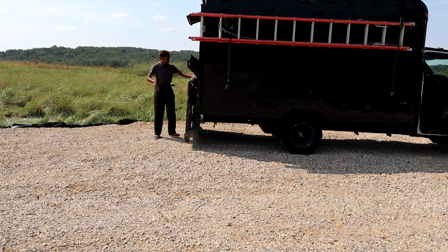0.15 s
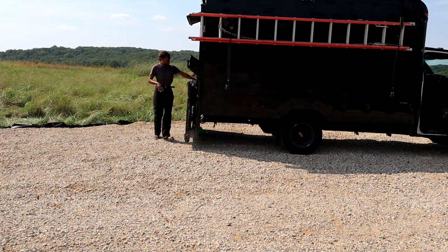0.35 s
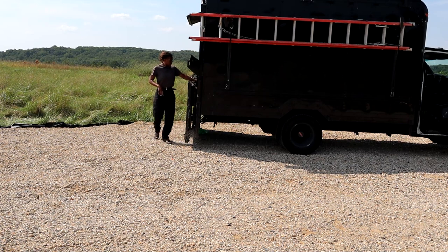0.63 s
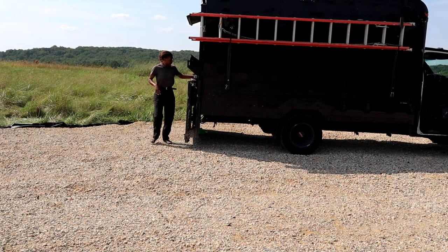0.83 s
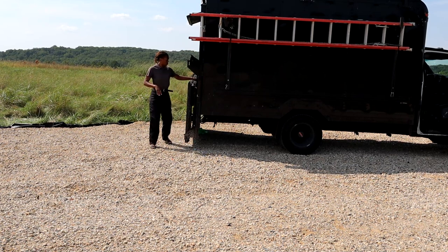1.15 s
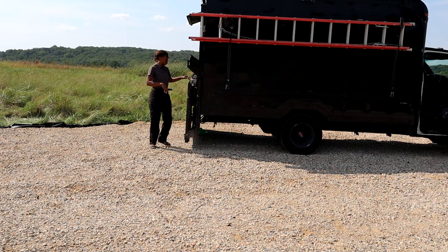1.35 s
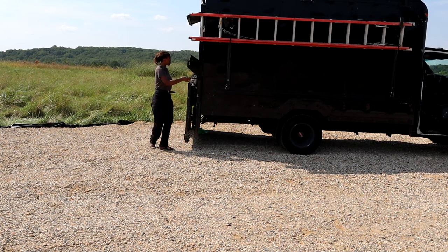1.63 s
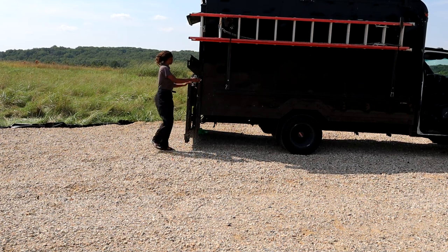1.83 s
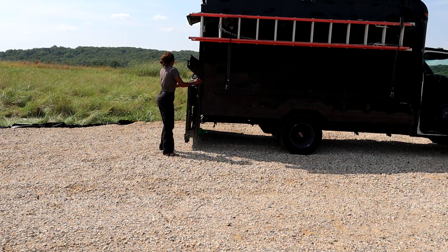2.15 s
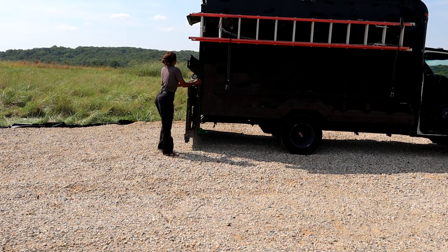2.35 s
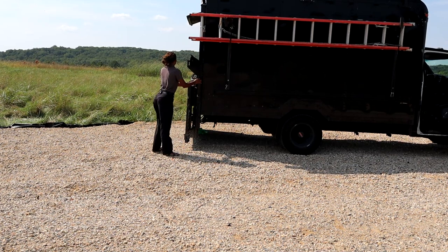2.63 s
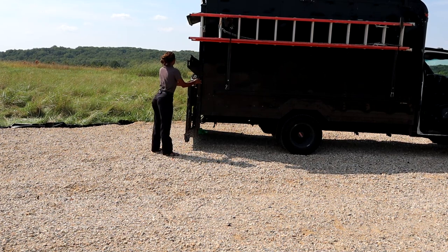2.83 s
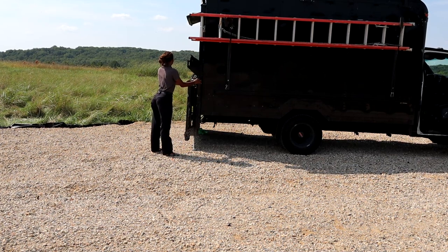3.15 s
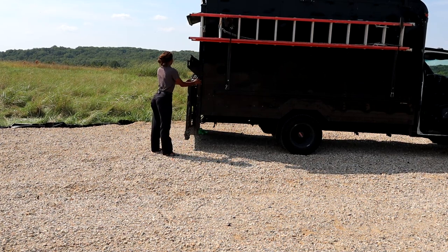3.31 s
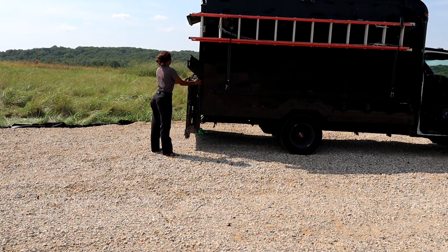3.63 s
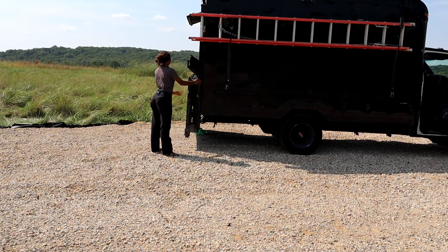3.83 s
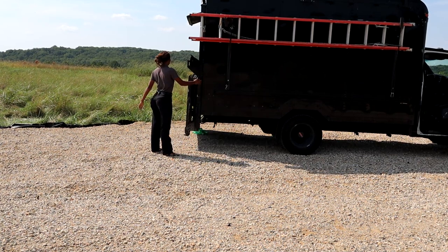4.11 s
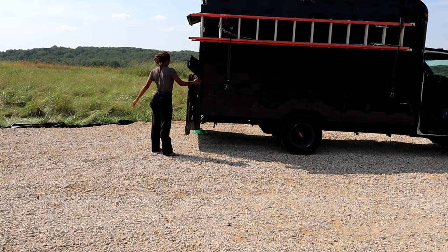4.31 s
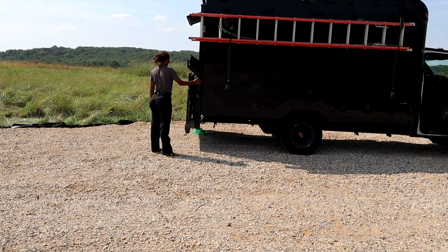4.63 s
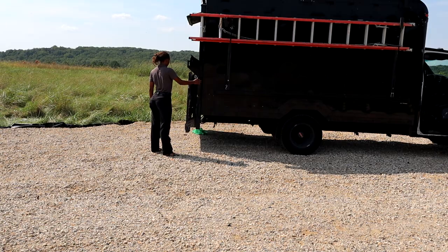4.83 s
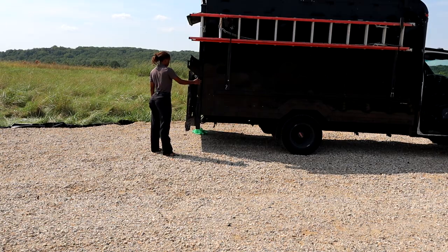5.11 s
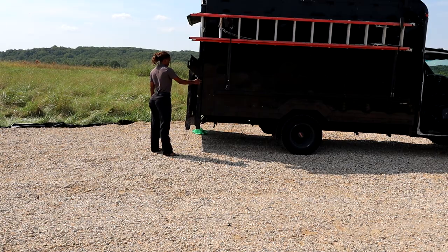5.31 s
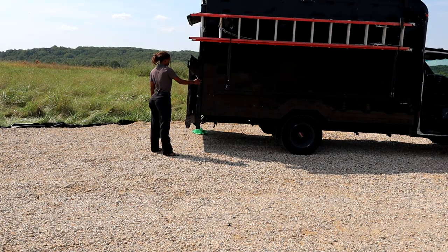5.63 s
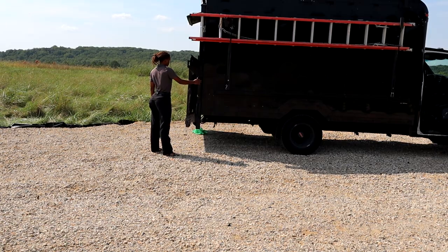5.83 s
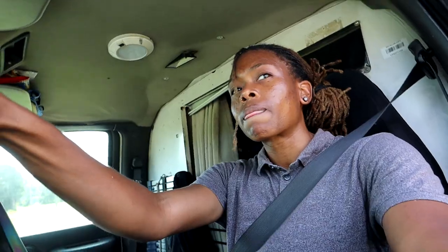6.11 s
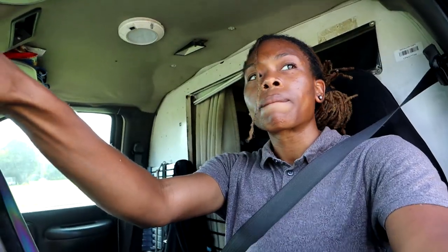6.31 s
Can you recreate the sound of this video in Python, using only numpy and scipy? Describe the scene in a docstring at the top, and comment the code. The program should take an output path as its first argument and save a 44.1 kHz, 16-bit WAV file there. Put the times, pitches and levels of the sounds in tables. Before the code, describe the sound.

From 0 s, an open gravel yard: strong low wind gusts buffet the microphone, over faint high hiss, throbbing insects and a soft low drone. From about 0.5 s soles crunch and individual stones knock, busiest between 1 and 1.8 s. At 1.4 s a steel latch snaps with a short, dry triple clatter; a bright scuff and grit snap follow at 1.6 s. Steps thin out until 2.75 s. At 2.8 s a relay clacks twice and an electric pump motor spins up within half a second, straining at first, into a dense, nasal, buzzing whine with rushing oil noise. It holds, rising very slightly in pitch and growing a little louder, while gusts weaken and the drone swells. At 6.0 s an abrupt cut to a moving truck's cab: loud overloaded engine boom, trim rattle and several hard, thudding knocks, ending around 6.45 s.

```python
"""A gravel yard on a windy day: gusts buffet the microphone, feet crunch, insects sing, a low drone hums.
At 1.4 s a latch snaps on its steel frame. At 2.8 s a relay clacks and the liftgate's pump motor spins up.
Its whine is a stack of sine waves; the wind, hiss and crunch are shaped noise and clicks.
At 6.0 s the scene cuts to the moving truck's cab: boom from ringing low tones, and a few hard knocks."""
import sys
import numpy as np
from scipy import signal
from scipy.fft import rfft, irfft, next_fast_len
from scipy.io import wavfile
from scipy.ndimage import uniform_filter1d

SR = 44100
rng = np.random.default_rng(int(sys.argv[2]) if len(sys.argv) > 2 else 0)


def pcm_store(signal):
    """Save signal as 16-bit PCM."""
    levels = np.round(np.clip(np.atleast_2d(signal), -1, 1) * 32767)
    wavfile.write(sys.argv[1], SR, levels.astype(np.int16).T)


N = 284533

CUT_S = 6.015   # the yard gives way to the cab
TOP_EDGE_HZ = 15690   # hardly anything is left above this

# Pump motor: (time [s], whine gain [dB], oil noise level [dB], strain [0-1])
PUMP = [(2.8, -38, -46, 0.6), (2.9, -35.5, -37.5, 0.85), (3.01, -32.5, -34.5, 0.8),
        (3.14, -32.5, -36.5, 0.56), (3.62, -33, -35, 0.62), (3.99, -30, -34.5, 0.64),
        (5.0, -29.5, -35, 0.44), (6.0, -27.5, -35.5, 0.65)]
# Pump speed: (time [s], pump pulses [per s])
PUMP_SPEED = [(2.81, 63.9), (2.85, 71.2), (2.9, 77.9), (2.94, 85.1), (2.97, 89.0), (3.0, 92.3),
              (3.04, 94.6), (3.15, 98.5), (3.25, 99.9), (3.36, 100.6), (3.98, 102.2), (5.04, 103.6),
              (5.22, 103.5), (5.99, 104.4)]
# Lower tones of the whine: (multiple of the pulse rate, level before boosts [dB])
LOW_MULTIPLES = [(1, -20), (2, -10.5), (3, -15), (4, -7), (5, -13), (6, -7), (7, -11.5), (8, -10), (9, -8),
                 (10, -8), (11, -10.5), (12, -11), (13, -8.5), (14, -11.5), (15, -6), (16, -15), (17, -21),
                 (18, -13.5), (19, -17), (20, -13), (21, -24), (22, -13), (23, -20), (24, -15), (25, -21.5),
                 (26, -43.5), (27, -54), (28, -29.5), (29, -26.5), (30, -43.5), (31, -31.5), (32, -53),
                 (33, -39), (34, -38.5), (35, -33), (36, -32.5)]
# Higher tones of the whine: (multiple, level once up to speed, before boosts [dB])
HIGH_MULTIPLES = [(43, -37), (44, -32.5), (45, -43), (46, -33), (48, -37.5), (49, -37), (62, -42),
                  (63, -36), (64, -32), (65, -38), (66, -32), (67, -58), (68, -38), (69, -38)]
# Faint commutator and gear-mesh whistles: (multiple, level before boosts [dB], extra early in the lift [dB])
WHISTLES = [(76, -44, 0), (88, -42, 9), (107, -43, 5), (112, -39, 0), (128, -45, 0), (152, -43, 6)]
# The whine's balance shifts as the gate rises: (multiple, level early in the lift against its end [dB])
BALANCE_SHIFT = [(4, 0), (6, -1.5), (8, 2), (9, 1), (10, -1), (11, -0.5), (12, 0.5), (13, 4), (14, -1),
                 (15, -3), (16, 2), (17, 2), (18, 0.5), (20, -1), (22, -0.5), (23, -1.5), (25, 1)]
# Resonances of the pump housing: (pitch [Hz], half width [Hz], boost at full strain [dB])
HOUSING = [(552, 22, 19.5), (805.6, 9.5, 14), (1005, 12, 9), (1210, 16, 7.5), (1340, 44, 3),
           (1760, 6.4, 16), (1698, 92, -1.5), (2547, 16, 6.5), (3128, 41, 25.5)]
# Colour of the oil noise: (pitch [Hz], relative level [dB per Hz])
OIL_COLOUR = [(180, -57), (300, -7), (460, -5.5), (600, 0), (760, -10), (850, 3.5), (1200, -8), (1360, 4.5),
              (1960, -16.5), (2330, -13.5), (3500, -17), (4000, -32.5), (4900, -23), (5900, -33.5),
              (6800, -27.5), (9000, -31.5), (12000, -70)]
FRAME_HZ, FRAME_HALF_WIDTH_HZ, FRAME_DB = 1364, 37, 7.5   # the frame lifts any multiple that lies near here
SPIN_UP_END_S, SPIN_UP_WAVER_DB, SPIN_UP_HIGH_DB = 3.229, 2.0, -10   # ragged tones, weak high multiples
EARLY_END_S = 3.9   # the extra level of the whistles has faded by now

# Engine and trim in the cab: (time [s], boom level before overload [dB], rattle level before shaking [dB])
CAB = [(6.015, -25, -55), (6.057, -10.5, -50), (6.171, -13.5, -55), (6.195, -25.5, -56.5),
       (6.293, -12, -53), (6.309, -36, -64), (6.327, -18, -55), (6.373, -23.5, -56), (6.452, -21, -48)]
# Boom tones of the cab: (pitch [Hz], relative level [dB], time to ring down by 60 dB [s])
CAB_MODES = [(42.4, -3.5, 0.18), (93, 4, 0.067), (141.6, 0, 0.056), (194, -4, 0.044)]
# Colour of the trim rattle: (pitch [Hz], relative level [dB per Hz])
RATTLE_COLOUR = [(290, -41), (500, -7), (769, -15.5), (804, -4.5), (1410, -20), (1490, -24.5),
                 (3090, -30.5), (7000, -46), (9100, -73), (15400, -120)]
# Hard knocks: (time [s], depth before rounding [dB], width [ms], tip rounding [ms])
KNOCKS = [(6.061, -6.5, 2.6, .03), (6.083, -9, 2.6, .05), (6.128, -7.5, 2.2, .02), (6.150, -8, 2.2, .03),
          (6.282, -7, 4.0, .4), (6.410, -10.5, 2.6, .05), (6.444, -10, 2.6, .05)]
FIRINGS_PER_S, FIRING_JITTER = 45.1, 0.12   # average rate; unevenness as a share of a cycle
REBOUND_S, REBOUND_WIDTH_S, REBOUND_SHARE = 0.006, 0.004, 0.7   # after a knock the pressure swings back

# Gusts on the microphone: (time [s], level [dB], length at half height [s], flutter against the gust [dB])
GUSTS = [(0.173, -15.5, .11, -12), (0.295, -19, 0.076, -11.5), (.479, -21, 0.047, -8.5),
         (0.737, -18.5, 0.25, -9), (1.01, -22.5, 0.11, -8.5), (1.166, -26, 0.083, -7),
         (1.28, -25, 0.052, -7), (1.43, -18.5, 0.075, -12.5), (1.537, -18.5, 0.027, -20),
         (1.65, -16, 0.066, -12), (1.75, -19.5, 0.1, -12), (1.847, -14, 0.098, -17.5),
         (2.075, -32.5, 0.06, -3), (2.204, -26.5, 0.032, -16), (2.314, -19.5, 0.12, -16),
         (2.454, -17.5, 0.077, -20), (2.642, -22, 0.1, -5), (2.95, -18, 0.038, -8),
         (3.069, -16.5, 0.12, -11), (3.314, -24, 0.074, -10), (3.543, -23.5, 0.1, -8.5),
         (3.67, -20, 0.09, -16), (4.27, -28, 0.089, -5.5), (4.775, -27, 0.042, -16),
         (4.947, -24.5, 0.13, -18), (5.073, -23.5, .07, -10), (5.56, -28.5, 0.066, -10)]
# Buffeting between gusts: (time [s], level before lumps [dB])
BREEZE = [(0.0, -26.5), (1.2, -31), (1.7, -20), (2.1, -29), (3.9, -32), (6.0, -31.5)]
# Colour of the deep buffeting: (pitch [Hz], relative level [dB per Hz])
BUFFET_COLOUR = [(11, -44), (18, 6), (50, 4), (70, -4.5), (124, -23.5), (155, -21), (179, -20.5),
                 (261, -39), (293, -36), (400, -41), (520, -79), (880, -120)]
# Colour of the thinner rush: (pitch [Hz], relative level [dB per Hz])
RUSH_COLOUR = [(65, -9), (110, -2), (189, -2.5), (292, -4), (350, -11.5), (566, -12.5), (649, -20),
               (903, -15.5), (1200, -26.5), (2230, -36.5), (4000, -50), (5200, -54), (8800, -120)]
BREEZE_LUMPS_DB, RUSH_DB = 4, -38.5
RUSH_FOLLOWS = 0.083   # the rush takes this share of the buffet's swing in dB
FLUTTER_HZ = 58, 115.7   # band of the faster eddies that ride on a gust

# Latch snapping on the frame: (time [s], strength [dB], tilt [dB per octave], chatter fade [s])
LATCH_BLOWS = [(1.403, -26, -31, 0.003), (1.4172, -21, 4.5, 0.007), (1.437, -30, -7, 0.024)]
# Ringing tones of the steel: (pitch [Hz], relative level [dB], time to ring down by 60 dB [s])
STEEL_MODES = [(845, -3, 0.022), (1015, -0.5, 0.042), (1390, -1, 0.016), (1620, -12, 0.014),
               (1800, 0.5, 0.019), (2140, -3, 0.013), (2460, -7, 0.021), (2680, -13, 0.024),
               (2980, -15, .012), (3410, -13, 0.0099), (4650, -37, .01)]
# Relay solenoid pulling in and bouncing: (time [s], strength [dB], tilt [dB per octave], chatter fade [s])
RELAY_BLOWS = [(2.7935, -22.5, -3.5, 0.01), (2.808, -23, -8, 0.02)]
# Ringing tones of the solenoid: (pitch [Hz], relative level [dB], time to ring down by 60 dB [s])
SOLENOID_MODES = [(1000, -20, 0.027), (1175, 4, 0.035), (1440, -4.5, 0.04), (1680, -16, 0.023),
                  (1930, -9, 0.035), (2200, -14, 0.023), (2390, -9, 0.032), (2700, -20, 0.023)]
CONTACT_S = 0.002976   # chatter builds for this long before the hard contact

# Soles pressing into gravel: (time [s], crunch level [dB], length at half height [s])
STEPS = [(.61, -46, 0.043), (.765, -40, 0.018), (.815, -48, .04), (.992, -40.5, 0.039), (1.12, -46, 0.14),
         (1.19, -42.5, 0.054), (1.32, -50.5, 0.099), (1.615, -36, 0.054), (1.68, -42, 0.087),
         (1.795, -46, 0.041), (1.965, -69, 0.034), (2.16, -50, 0.034), (2.27, -51, 0.083),
         (2.49, -57, 0.035)]
# Soles dragging, a bright swish: (time [s], level [dB], length at half height [s])
SCUFFS = [(1.0, -58, .1), (1.63, -48.5, 0.079), (1.78, -53, .09), (2.75, -54, .08)]
# Single stones knocking: (time [s], level of the main ring [dB], pitch of the main ring [Hz])
STONES = [(0.596, -39, 847), (0.622, -43, 1550), (0.715, -44, 1600), (0.759, -43, 740), (0.807, -38, 970),
          (0.992, -35, 1175), (1.073, -37, 1430), (1.186, -28.5, 760), (1.314, -36, 896),
          (1.34, -42.5, 1690), (1.591, -49, 710), (1.616, -31, 875), (1.66, -35, 980), (1.70, -37, 1000),
          (1.777, -35, 780), (2.217, -38, 1040), (2.268, -37, 1040), (2.295, -37, 747), (2.608, -37, 1049)]
# Bright grit snapping: (time [s], noise level before the treble filter [dB])
GRIT_TICKS = [(1.612, -34.5), (1.7814, -47), (2.2463, -51)]
SHUFFLE_DB = -57   # crunch between the steps

# Far hiss: (time [s], level [dB])
AIR = [(0.0, -57), (1.0, -55), (1.8, -53.5), (1.9, -58.5), (2.5, -56), (3.4, -55), (3.9, -53), (4.7, -51),
       (6.0, -50.5)]
# Colour of the far hiss: (pitch [Hz], relative level [dB per Hz])
HISS_COLOUR = [(1760, 4.5), (3000, -2), (3610, -11), (3980, -36), (4440, -6), (4660, -1.5), (5780, -16),
               (7300, -11), (8100, -2.5), (9100, -8), (10200, -2.5), (12400, -0.5), (15600, -7.5)]
# Insect bands: (pitch [Hz], width setting [Hz], level over the hiss before throbbing [dB], throbs [per s])
INSECTS = [(4530, 500, -13, 23), (8500, 930, -12.5, 22)]
# Low drone: (time [s], level before wavering [dB])
DRONE = [(0.0, -52), (1.4, -37), (2.0, -47), (3.8, -39.5), (4.6, -34.5), (6.0, -32)]
DRONE_HZ, DRONE_RING_S, DRONE_WAVER_DB = 152.2, 2.84 / 10.7, 0.5   # ring-down time is for 60 dB
DRONE_OVERTONE_HZ, DRONE_OVERTONE_DB = 294.2, -49


def pump():
    """Multiples of the pulse rate swell where they cross housing resonances, over pulsing oil noise."""
    per_s, = in_time(PUMP_SPEED)
    whine_db, oil_db, strain = in_time(PUMP)
    # the shaft runs unevenly, more so under strain
    unevenness = 0.012 * (1 + 3 * strain ** 3) * drift(8)
    turn = 2 * np.pi * np.cumsum(per_s) / SR + unevenness

    # tone levels are worked out on every 8th sample to save time
    start = round(PUMP[0][0] * SR)
    coarse = slice(start, None, 8)
    spinning_up = between(0, SPIN_UP_END_S, 0.4)[coarse]
    early = between(0, EARLY_END_S, 0.5)[coarse]
    share_of_lift_left = between(0, CUT_S, 2.865)[coarse] * (1 - spinning_up)
    tones = list(LOW_MULTIPLES)
    tones += [(k, db + SPIN_UP_HIGH_DB * spinning_up) for k, db in HIGH_MULTIPLES]
    tones += [(k, db + extra_db * early) for k, db, extra_db in WHISTLES]
    shifts = dict(BALANCE_SHIFT)

    whine = np.zeros(N)
    for k, level_db in tones:
        hz_now = k * per_s[coarse]
        housing_db = sum(db / (1 + ((hz_now - hz) / width) ** 2) for hz, width, db in HOUSING)
        boost = strain[coarse] * housing_db
        boost += shifts.get(k, 0) * share_of_lift_left
        boost += FRAME_DB / (1 + ((hz_now - FRAME_HZ) / FRAME_HALF_WIDTH_HZ) ** 2)
        # high multiples come and go more than low ones
        waver = (1.0 + 0.017 * k) * drift(5.3)[coarse]
        waver += SPIN_UP_WAVER_DB * spinning_up * drift(15)[coarse]
        gain = np.repeat(from_db(level_db + boost + waver), 8)[:N - start]
        whine[start:] += gain * np.sin(k * turn[start:] + rng.uniform(0, 2 * np.pi))

    # under strain the housing is also shaken at random
    growl = np.zeros(N)
    for hz, width, db in HOUSING[:7]:
        growl += from_db(db) * rms_one(ring(rng.standard_normal(N), hz, 1.1 / width))
    whine += from_db(-24) * strain ** 3 * growl
    oil = coloured(rng.standard_normal(N) * (1 + 0.11 * np.sin(turn)), OIL_COLOUR)
    return between(2.805, 9, 0.049) * (from_db(whine_db) * whine + from_db(oil_db) * oil)


def cab():
    """Uneven firings ring the cab's boom tones and shake the trim; hard knocks are sharp pressure dips."""
    boom_db, rattle_db = in_time(CAB)
    t = np.arange(N) / SR
    cycles = FIRINGS_PER_S * np.maximum(t - CUT_S + 0.18, 0)   # starts before the cut, so the boom is built up
    cycles = np.maximum.accumulate(cycles + FIRING_JITTER * drift(12.8))
    # one click at each whole cycle
    firings = -np.diff(np.floor(cycles), prepend=-0.0) * from_db(2.5 * drift(30))
    road = 0.012 * rng.standard_normal(N)
    boom = sum(from_db(db) * ring(firings + road, hz, t60) for hz, db, t60 in CAB_MODES)
    # seats and lining swallow the edges
    boom = signal.sosfilt(signal.butter(3, 300, fs=SR, output="sos"), boom)
    boom = from_db(boom_db) * evened(boom, 0.0535)

    shake = (1 + 0.6 * np.cos(2 * np.pi * cycles - 2.5)) * from_db(2.5 * drift(30))
    rattle = from_db(rattle_db) * coloured(rng.standard_normal(N), RATTLE_COLOUR) * shake

    knocks, clear = np.zeros(N), np.ones(N)
    for s, db, width_ms, tip_ms in KNOCKS:
        rounded_ms = np.hypot(1000 * (t - s), tip_ms)
        knocks -= from_db(db) * np.exp(-rounded_ms / (width_ms / 2))
        rebound = np.exp(-((t - s - REBOUND_S) / REBOUND_WIDTH_S) ** 2)
        knocks += REBOUND_SHARE * from_db(db) * rebound
        clear -= np.exp(-((t - s) / 0.008) ** 2)   # a knock takes the place of the boom
    overloaded = 0.39 * np.tanh(clear * boom / 0.28)   # the boom overloads the small microphone
    return overloaded + rattle + knocks


def wind():
    """Lumpy pressure on the microphone, quicker flutter in the gusts, and a thinner rush above."""
    breeze_db, = in_time(BREEZE)
    breeze = from_db(breeze_db + BREEZE_LUMPS_DB * drift(4.1))
    strength = np.hypot(breeze, swells([row[:3] for row in GUSTS]))
    buffet = evened(coloured(rng.standard_normal(N), BUFFET_COLOUR), 0.0916)

    eddy_band = signal.butter(2, FLUTTER_HZ, "band", fs=SR, output="sos")
    eddies = signal.sosfilt(eddy_band, rng.standard_normal(N))
    flutter_gain = swells([(s, db + flutter_db, length) for s, db, length, flutter_db in GUSTS])
    flutter = flutter_gain * evened(eddies, 0.05)

    rush = coloured(rng.standard_normal(N) * from_db(0.42 * drift(10)), RUSH_COLOUR)
    rush_gain = from_db(RUSH_DB) * rms_one(strength ** RUSH_FOLLOWS)
    return strength * buffet + flutter + rush_gain * rush


def blows(events, modes):
    """Each blow is a sharp contact amid a few ms of chatter, and both ring the tones of the struck body."""
    out, t = np.zeros(N), np.arange(4000) / SR
    for s, strength_db, tilt_db, chatter_s in events:
        at = round(s * SR)
        for hz, level_db, t60 in modes:
            burst = rng.standard_normal(4000) * np.exp(-t / chatter_s) * np.minimum(t / CONTACT_S, 1)
            burst = burst / np.sqrt(np.sum(burst ** 2))
            burst[round(CONTACT_S * SR)] += 0.53 * rng.choice([-1, 1])   # the hard contact
            tilted_db = strength_db + level_db + tilt_db * np.log2(hz / 1000)
            out[at:at + 4000] += from_db(tilted_db) * ring(burst, hz, t60)
    return signal.sosfilt(signal.butter(2, [600, 5000], "band", fs=SR, output="sos"), out)


def gravel():
    """Dense stone clicks under the soles, a bright scuff, and single stones that knock."""
    pitches = np.geomspace(600, 3600, 12)
    dealt = rng.integers(0, 12, N)   # which pitch each click gets
    clicks = grains(1500, spread_db=2.0)
    crunch = np.zeros(N)
    for k, hz in enumerate(pitches):
        crunch += ring(clicks * (dealt == k), hz, 4.7 / hz) * (hz / 1000) ** -0.6
    bright = signal.butter(2, 9000, "high", fs=SR, output="sos")
    scuff = signal.sosfilt(bright, grains(9000, spread_db=5.0))

    pressure = swells(STEPS) + from_db(SHUFFLE_DB) * between(0.44, 2.82, 0.04)
    out = pressure * rms_one(crunch) + swells(SCUFFS) * rms_one(scuff)
    for s, level_db, hz in STONES:
        click = np.zeros(N)
        click[round(s * SR)] = from_db(level_db)
        out += ring(click, hz, 0.058)
        out += 0.097 * ring(click, 3.8 * hz, 0.021) + 0.14 * ring(click, 3.56 * hz, 0.009)
    return out


def grit():
    """Grit snaps as a few ms of bright crackle: noise that starts at once and dies away."""
    t = np.arange(N) / SR
    bursts = sum(from_db(db) * (t > s) * np.exp(-np.abs(t - s) / 0.004) for s, db in GRIT_TICKS)
    treble = signal.butter(4, 5800, "high", fs=SR, output="sos")
    return signal.sosfilt(treble, bursts * rng.standard_normal(N))


def field():
    """Smooth far hiss, two throbbing insect bands and a wavering low drone, all from filtered noise."""
    hiss_db, = in_time(AIR)
    drone_db, = in_time(DRONE)
    air = coloured(rng.standard_normal(N), HISS_COLOUR)
    for hz, width, level_db, per_s in INSECTS:
        uneven_rate = per_s * (1 + 0.16 * drift(1.82))
        beat = np.sin(2 * np.pi * np.cumsum(uneven_rate) / SR)
        throb = from_db(2.7 * beat + 2.0 * drift(21))
        band = rms_one(ring(rng.standard_normal(N), hz, 1.5 / width))
        air += from_db(level_db) * throb * band
    drone = rms_one(ring(rng.standard_normal(N), DRONE_HZ, DRONE_RING_S))
    overtone = rms_one(ring(rng.standard_normal(N), DRONE_OVERTONE_HZ, 0.16))
    drone_gain = from_db(drone_db + DRONE_WAVER_DB * drift(3.0))
    return from_db(hiss_db) * air + drone_gain * drone + from_db(DRONE_OVERTONE_DB) * overtone


def from_db(db):
    """Turn a level in dB into a plain multiplier."""
    return 10 ** (np.asarray(db) / 20)


def rms_one(x):
    """Scale a signal so that its rms (its average strength) is 1."""
    return x / np.sqrt(np.mean(x ** 2) + 1e-20)


def evened(x, span_s):
    """Even out the loudness: divide a signal by its own running rms."""
    return x / np.sqrt(uniform_filter1d(x ** 2, int(span_s * SR)) + 1e-12)


def in_time(rows):
    """Join the points of a table with straight lines; one curve for each column after the time."""
    s, *columns = np.transpose(rows)
    return [np.interp(np.arange(N) / SR, s, c) for c in columns]


def between(start, end, fade):
    """A gate that opens after start and is shut by end, each over fade seconds."""
    t = np.arange(N) / SR
    return np.clip(np.minimum(t - start, end - t) / fade, 0, 1)


def swells(rows):
    """Each row swells and fades as a bell; their powers add up to one gain."""
    t = np.arange(0, N + 32, 32) / SR   # every 32nd sample is enough
    power = np.zeros(len(t))
    for s, db, length in rows:
        bell = np.exp(-np.log(16) * ((t - s) / length) ** 2)
        power += (from_db(db) * bell) ** 2
    return np.interp(np.arange(N), np.arange(0, N + 32, 32), np.sqrt(power))


def drift(rate):
    """Slow random wandering with rms 1; a higher rate [Hz] wanders faster."""
    r = np.exp(-80 * np.pi * rate / SR)   # one step for every 40 samples
    noise = rng.standard_normal(N // 40 + 2002)
    slow = signal.lfilter([1], [1, -2 * r, r * r], noise)[2000:]
    return np.interp(np.arange(N) / 40, np.arange(len(slow)), rms_one(slow))


def coloured(x, spectrum):
    """Shape a signal by a spectrum, nearly silent below its first point, and scale it to rms 1."""
    size = next_fast_len(N)
    hz = np.maximum(np.fft.rfftfreq(size, 1 / SR), 1)
    points = np.array(spectrum)
    level = np.interp(np.log(hz), np.log(points[:, 0]), points[:, 1], left=-120)
    return rms_one(irfft(rfft(x, size) * from_db(level), size)[:N])


def ring(clicks, hz, t60):
    """Each unit click starts a sine of height 1 that dies by 60 dB in t60 seconds."""
    r, w = from_db(-60 / (t60 * SR)), 2 * np.pi * hz / SR
    return signal.lfilter([0, np.sin(w)], [1, -2 * r * np.cos(w), r * r], clicks + 1e-18)


def grains(per_s, spread_db):
    """Random clicks of uneven size and either sign."""
    sizes = from_db(spread_db * np.minimum(rng.exponential(1, N), 5)) * rng.choice([-1, 1], N)
    return sizes * (rng.random(N) < per_s / SR)


def scene():
    """The yard, then a hard cut to the cab."""
    latch = blows(LATCH_BLOWS, STEEL_MODES)
    relay = blows(RELAY_BLOWS, SOLENOID_MODES)
    yard = pump() + wind() + latch + relay + gravel() + grit() + field()
    outside = between(-1, CUT_S, 0.0005)
    return (outside * yard + (1 - outside) * cab())[None]


def record(dry):
    """A steep low-pass filter cuts off the top of the treble."""
    return signal.sosfilt(signal.ellip(12, 0.3, 80, TOP_EDGE_HZ, fs=SR, output="sos"), dry)


dry = scene()
out = record(dry)
pcm_store(out)
```